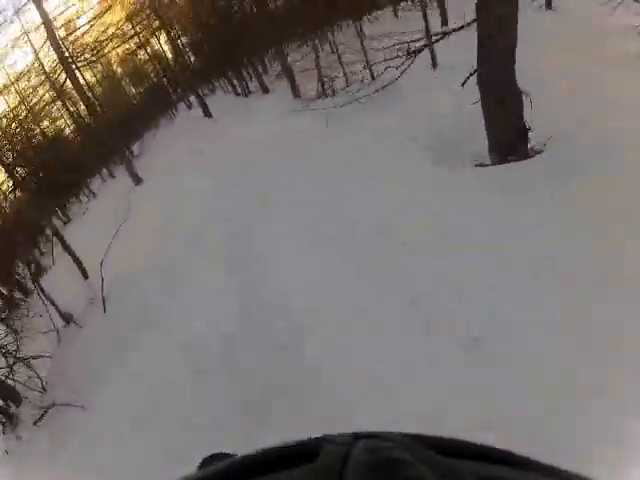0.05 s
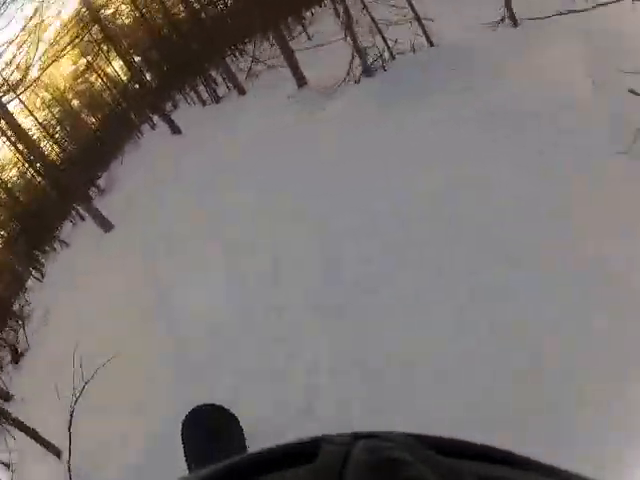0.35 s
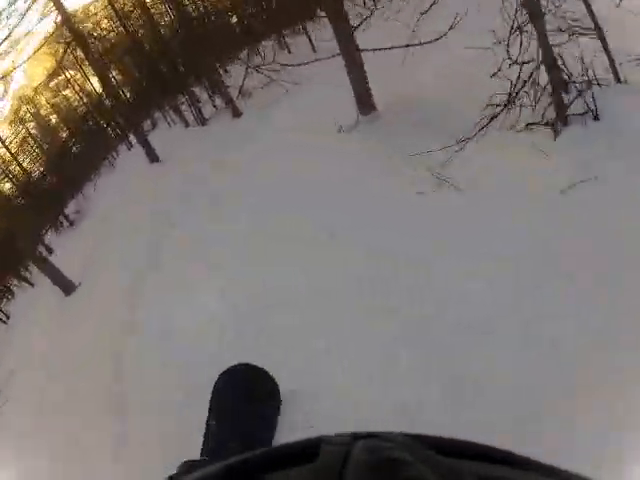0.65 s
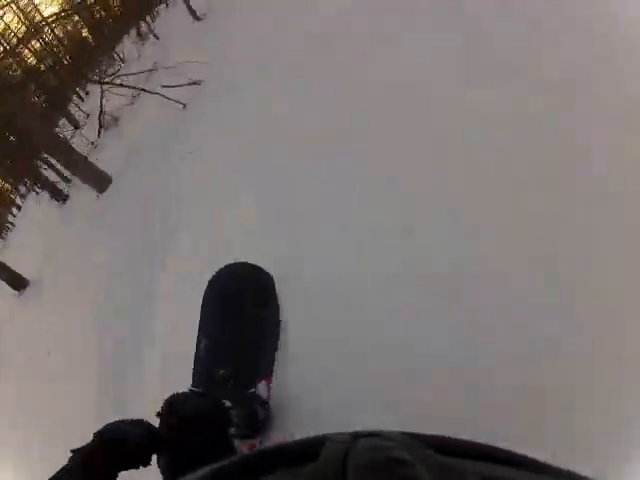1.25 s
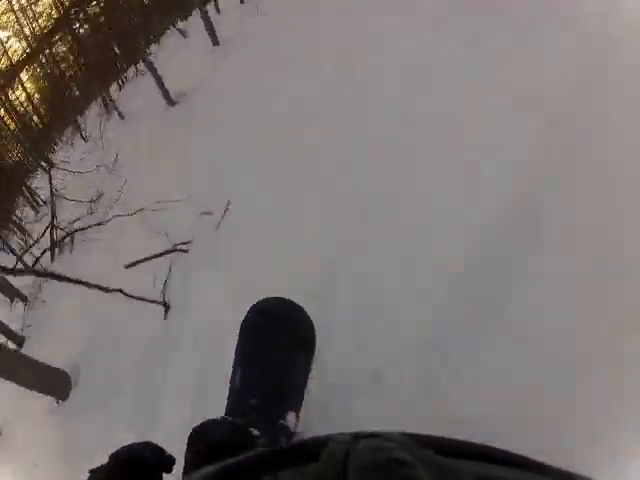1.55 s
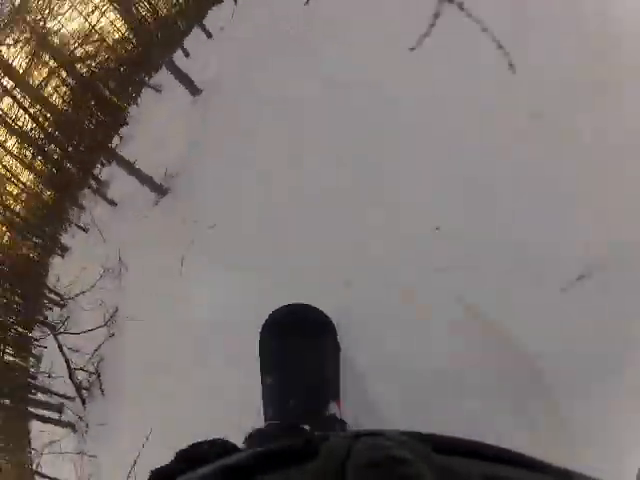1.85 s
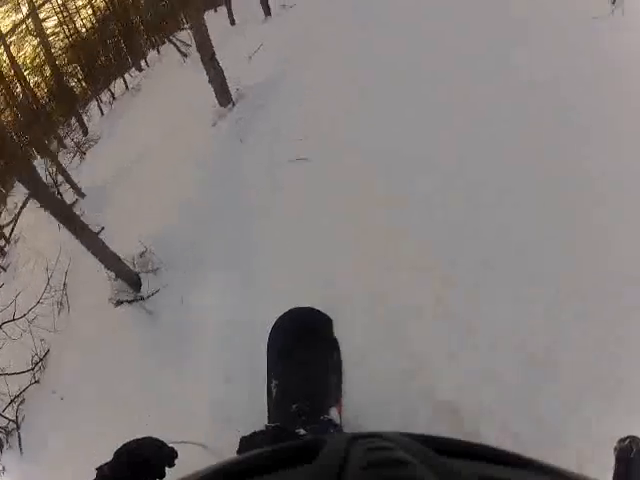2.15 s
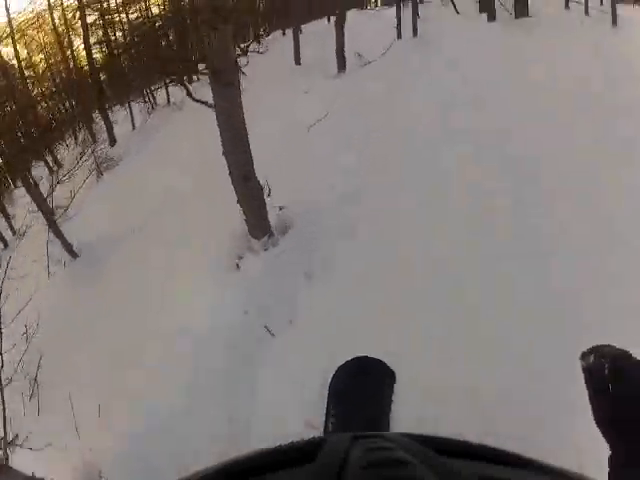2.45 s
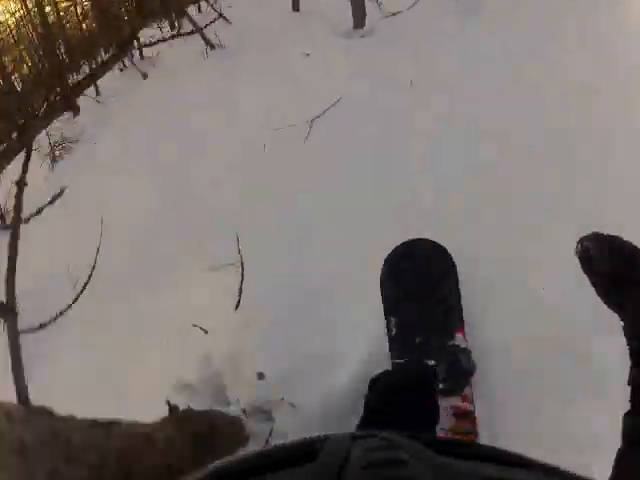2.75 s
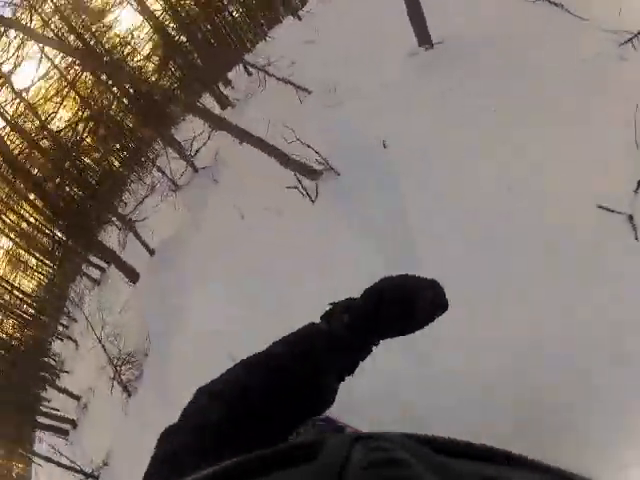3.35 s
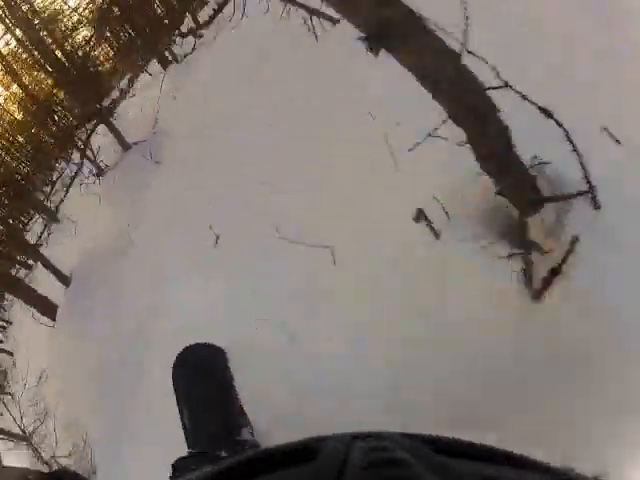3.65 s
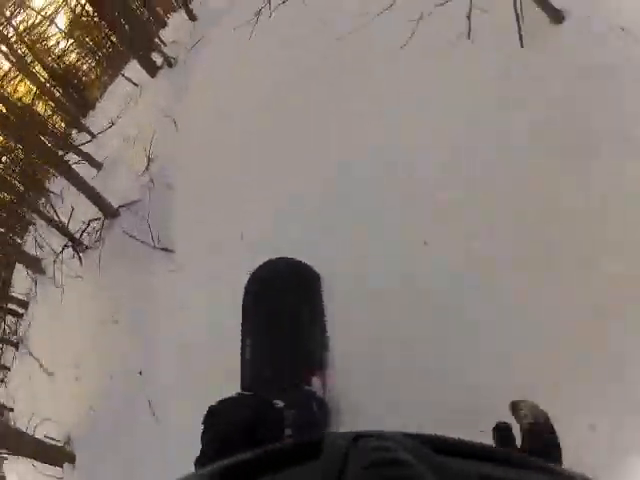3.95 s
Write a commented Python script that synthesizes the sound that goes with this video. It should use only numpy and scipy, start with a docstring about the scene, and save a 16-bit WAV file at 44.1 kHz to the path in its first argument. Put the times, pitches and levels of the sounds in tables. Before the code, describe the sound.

A snowboard hisses and swishes quietly over soft snow among trees, with low wind rumble and dull bumps. Twigs tick against the rider, then two branches crack loudly on the helmet, overloading the cased microphone mounted there.

```python
"""Among trees in soft snow: a snowboard run, heard from a cased camera on the rider's helmet.
The edge throws a swish of snow at each push; the base hisses, drones and jolts over bumps.
Two branches strike the helmet, ring its modes and overload the microphone.
Twigs tick against the rider and wind rumbles on the case."""
import sys
import numpy as np
from scipy import signal
from scipy.fft import rfft, irfft, next_fast_len
from scipy.io import wavfile
from scipy.ndimage import map_coordinates

SR = 44100
rng = np.random.default_rng(int(sys.argv[2]) if len(sys.argv) > 2 else 0)


def store_pcm(level_fs):
    """Save levels as 16-bit WAV."""
    pcm = np.round(np.clip(level_fs, -1, 1) * 32767).astype(np.int16)
    wavfile.write(sys.argv[1], SR, np.atleast_2d(pcm).T)


N = 176400


def amp(db):
    """Decibels to gain."""
    return 10 ** (np.asarray(db) / 20)


def unit_rms(x):
    """Scale to rms 1."""
    return x / np.sqrt(np.mean(x ** 2) + 1e-20)


def gain_at(colour, hz):
    """Gain from (freq_hz, gain_db) points on a log frequency axis."""
    freq_hz, gain_db = np.transpose(colour)
    return amp(np.interp(np.log(hz + 1), np.log(freq_hz + 1), gain_db))


def curve(points):
    """(time_s, value) points to one value per sample."""
    return np.interp(np.arange(N) / SR, *np.transpose(points))


def wobble(rate_hz):
    """Smooth random curve, rate_hz knots a second."""
    return map_coordinates(rng.standard_normal(N // 20), [np.arange(N) * rate_hz / SR], mode="wrap")


def filtered(x, response):
    """Zero-phase filter with gain response(hz)."""
    size = next_fast_len(len(x) + 8192)
    return irfft(rfft(x, size) * response(np.fft.rfftfreq(size, 1 / SR)), size)[:len(x)]


def coloured(x, colour):
    """Filter by a colour table, then scale to rms 1."""
    return unit_rms(filtered(x, lambda hz: gain_at(colour, hz)))


def grainy(colour, grain_db, grain_hz):
    """Coloured noise in tiny clumps, rms 1."""
    return coloured(rng.standard_normal(N) * amp(grain_db * wobble(grain_hz)), colour)


def add(track, start_s, sound):
    """Mix a sound into the track."""
    part = track[round(start_s * SR):][:len(sound)]
    part += sound[:len(part)]


# edge pushes: start_s, length_s, level_db
PUSHES = [(0.103, 0.13, -51.5), (0.206, 0.086, -53.5), (0.272, .15, -53.5), (0.615, 0.16, -55),
          (.7, 0.13, -46.5), (0.79, 0.08, -47), (1.545, 0.065, -56), (1.743, 0.18, -52.5),
          (1.82, 0.16, -61), (2.14, 0.22, -54.5), (2.364, 0.13, -60), (2.73, 0.18, -50.5),
          (2.853, 0.18, -51), (3.548, 0.12, -46.5), (3.678, .16, -50), (3.916, 0.056, -38.5)]
# spray through the case resonances: freq_hz, gain_db
SPRAY_COLOUR = [(400, -36), (700, -24), (970, -23.5), (1150, -7.5), (1310, 5.5), (1490, -24.5), (1670, 4),
                (1900, -12.5), (2240, 3.5), (2550, -8), (3100, -17.5), (3520, -6), (4150, -28.5),
                (5400, -21), (6020, -39.5), (6650, -19.5), (7800, -42), (8480, -9), (9100, -43.5),
                (9750, -9), (10100, -13.5), (10700, -19), (11300, -33), (12700, -34), (13400, -17),
                (14300, -15), (15500, -32)]


def edge(rise_s=0.041, fall_s=0.064, crumbs_per_s=460, crumb_db=-11.5, scatter_db=5):
    """Each push throws a swish of snow and ice crumbs that swells, holds and fades."""
    t, power = np.arange(N) / SR, np.zeros(N)
    for start_s, length_s, level_db in PUSHES:
        shape = np.clip((t - start_s) / rise_s, 0, 1) * np.clip((start_s + length_s - t) / fall_s, 0, 1)
        power += (amp(level_db) * shape) ** 2
    impacts = (rng.random(N) < crumbs_per_s / SR) * rng.standard_normal(N)
    sizes = amp(scatter_db * rng.standard_normal(N))
    crumbs = amp(crumb_db) * coloured(impacts * sizes, CASE_RESPONSE)
    flutter = amp(0.44 * wobble(45))
    spray = grainy(SPRAY_COLOUR, grain_db=-0.5, grain_hz=900)
    return np.sqrt(power) * flutter * (spray + crumbs)


# sliding hiss: time_s, level_db
HISS_LEVEL = [(0, -59.5), (.3, -56), (.44, -60), (.48, -61.5), (.55, -59), (.9, -55.5), (1.07, -55),
              (1.24, -58.5), (1.36, -54.5), (1.46, -63), (1.55, -55.5), (1.7, -55.5), (1.95, -55.5),
              (2.08, -64.5), (2.35, -64), (2.53, -61), (2.68, -57.5), (3.02, -56.5), (3.08, -53),
              (3.16, -57), (3.27, -57), (3.52, -58.5), (3.67, -60.5), (3.89, -52.5), (4, -59.5)]
# hiss spectrum: freq_hz, gain_db
HISS_COLOUR = [(410, -12), (700, -10), (968, -14.5), (1070, -3.5), (1290, -1), (1800, -4.5), (1950, -7),
               (2220, -2), (2490, -7.5), (2690, -7), (3070, -13.5), (3450, -8.5), (4190, -20.5),
               (5150, -18), (6020, -28.5), (6850, -15), (7800, -20), (8430, -15.5), (9600, -18),
               (11400, -18.5), (14200, -16.5), (14700, -19.5), (15500, -47)]
# drone on packed snow: time_s, level_db
DRONE_LEVEL = [(0, -52), (.2, -54), (.3, -56.5), (.48, -65), (.56, -56.5), (.7, -65), (.75, -52),
               (.83, -49), (.93, -53.5), (1.1, -47.5), (1.33, -50.5), (1.45, -64), (1.56, -51), (1.68, -51),
               (1.72, -56), (1.77, -46), (1.86, -50), (1.95, -58.5), (2.08, -66.5), (2.28, -60),
               (2.55, -60.5), (2.74, -60), (2.93, -51.5), (3.1, -56.5), (3.3, -61.5), (3.53, -60),
               (3.6, -55.5), (3.7, -59), (3.82, -58.5), (3.92, -51), (4, -59)]
# drone spectrum: freq_hz, gain_db
DRONE_COLOUR = [(70, -13.5), (160, -2), (290, 1.5), (380, -3), (470, -12), (570, -9), (720, -19),
                (1000, -25.5), (2000, -69)]


def base():
    """The base hisses and drones over uneven snow."""
    hiss = amp(curve(HISS_LEVEL) + 1.7 * wobble(29.62)) * grainy(HISS_COLOUR, grain_db=2, grain_hz=920)
    drone = amp(curve(DRONE_LEVEL) + 0.5 * wobble(35)) * grainy(DRONE_COLOUR, grain_db=2.5, grain_hz=110)
    return hiss + drone


# branch hits: start_s, level_db, spot_mix (0 = contact spot a, 1 = b), crack_db, contact_s, crack_t60_s
BRANCH_HITS = [(2.9621, -0.5, 0.22, -16, 0.0043, .016), (2.9744, -18.5, 0.2, 18.5, 0.00061, 0.0073),
               (3.8436, -1.5, 0.84, -6, 0.0054, 0.016)]
# helmet and case modes: freq_hz, t60_s, spot_a_db, spot_b_db
HELMET_MODES = [(196.6, 0.014, -13, -7), (450, 0.02, -18.5, -13), (797, 0.0087, -20, -16),
                (967, 0.006, -16.5, -19), (1441, 0.0056, -16, -9.5), (1693, 0.0077, 1, -45),
                (1855, .018, -9.5, -4), (2106, 0.012, -10, -7.5), (2335, 0.015, -8, -14.5),
                (2679, 0.016, -4.5, -14.5), (3180, 0.0065, -19.5, -15), (3905, 0.054, -19, -41),
                (9060, 0.023, -15.5, -30.5), (9370, .01, -15, -20.5), (10090, .02, -20, -17),
                (14070, 0.014, -60, -14.5)]
# faint after-ring of the helmet: freq_hz, t60_s, spot_a_db, spot_b_db
SLOW_MODES = [(188, .4, -42, -41), (1440, .42, -38, -66)]
# splintering wood: freq_hz, gain_db
WOOD_COLOUR = [(200, -24), (900, -16), (1300, 7.5), (2200, 3), (3300, 12.5), (4200, -4.5), (6000, -8.5),
               (7800, 7), (8800, 3), (10300, -16.5), (11300, -9), (12300, -35), (15000, -17)]


def branches(rise_s=0.00026, splinter_db=-36.5, splinter_t60_s=0.089):
    """A branch cracks and drives the helmet's modes during contact; its fibres tear faintly after."""
    out, t = np.zeros(N), np.arange(SR // 2) / SR
    for start_s, level_db, spot_mix, crack_db, contact_s, crack_t60_s in BRANCH_HITS:
        free_s = np.maximum(t - contact_s, 0)
        ring = np.zeros(len(t))
        for freq_hz, t60_s, spot_a_db, spot_b_db in HELMET_MODES + SLOW_MODES:
            mode_db = spot_a_db + spot_mix * (spot_b_db - spot_a_db)
            ring += amp(mode_db - 60 * free_s / t60_s) * np.sin(2 * np.pi * (freq_hz * t + rng.random()))
        wood = coloured(rng.standard_normal(len(t)), WOOD_COLOUR)
        crack = amp(crack_db - 8 - 60 * free_s / crack_t60_s)
        splinter = amp(splinter_db - 60 * t / splinter_t60_s)
        attack = 1 - np.exp(-t / rise_s)
        add(out, start_s, amp(level_db) * attack * (ring + wood * (crack + splinter)))
    return out


# twig flicks: start_s, level_db, pitch_hz, t60_s
TWIG_FLICKS = [(0.052, -50.5, 5600, 0.036), (.528, -38.5, 5440, 0.012), (.556, -43, 5500, 0.014),
               (0.589, -47.5, 5060, 0.045), (.883, -45, 5530, .03), (.901, -42, 5430, 0.023),
               (1.206, -43, 5500, .025), (1.28, -47, 4970, 0.04), (1.34, -44.5, 5030, 0.086),
               (1.398, -48.5, 5500, 0.026), (1.574, -42.5, 4040, 0.065), (1.622, -31.5, 3950, 0.0063),
               (1.636, -39, 5470, 0.032), (1.6937, -35, 5500, 0.028), (1.755, -38.5, 5100, 0.055),
               (1.786, -26.5, 4240, 0.014), (1.824, -22.5, 3200, .014), (1.828, -22.5, 4500, 0.013),
               (1.8531, -20, 2170, 0.011), (1.862, -34, 5830, 0.02), (1.8854, -31.5, 1730, 0.014),
               (1.992, -33.5, 5300, 0.013), (1.998, -39.5, 5410, 0.048), (2.507, -42, 5470, 0.051),
               (2.765, -41.5, 5000, .02), (2.816, -41, 5000, 0.088), (3.333, -35, 3120, 0.034),
               (3.3455, -24.5, 3220, 0.011), (3.359, -37.5, 3900, 0.018), (3.41, -33, 6500, 0.011),
               (3.4501, -28.5, 3150, 0.0089), (3.466, -39.5, 2770, 0.019), (3.494, -34, 3670, 0.014),
               (3.53, -40.5, 5440, 0.013), (3.536, -41.5, 5500, 0.032), (3.594, -40, 5500, 0.035),
               (3.684, -47, 4480, .02), (3.696, -44, 5060, .025), (3.711, -40.5, 5000, 0.031),
               (3.827, -41.5, 4450, 0.11), (3.953, -39.5, 5000, 0.021)]
# what the case passes of twig ticks and ice crumbs: freq_hz, gain_db
CASE_RESPONSE = [(200, -18), (900, 4), (1250, 7), (2200, 11.5), (2700, -1), (3250, 9), (3900, -5),
                 (5200, 0), (6000, -14), (6700, 4), (7800, 1.5), (8800, 2.5), (10200, -5), (11300, -16),
                 (14000, -8.5), (16000, -23)]


def twigs(width_oct=1.7, rise_s=0.00016, hold_s=0.00045, ring_loss_db_per_oct=6.5):
    """Twigs flick the rider with dry ticks; thin ones are brighter, thick ones ring briefly."""
    out, t = np.zeros(N), np.arange(SR // 10) / SR
    free_s = np.maximum(t - hold_s, 0)
    for start_s, level_db, pitch_hz, t60_s in TWIG_FLICKS:
        def band(hz):
            octaves = np.log2((hz + 1) / pitch_hz)
            return gain_at(CASE_RESPONSE, hz) * np.exp(-0.5 * (octaves / width_oct) ** 2)
        tick = unit_rms(filtered(rng.standard_normal(len(t)), band))
        ring_db = 1.5 - ring_loss_db_per_oct * np.log2(pitch_hz / 2000)
        ring = amp(ring_db) * np.sin(2 * np.pi * pitch_hz * t)
        envelope = amp(level_db - 6 - 60 * free_s / t60_s) * (1 - np.exp(-t / rise_s))
        add(out, start_s, (tick + ring) * envelope)
    return out


# board jolts: start_s, level_db, pitch_hz
JOLTS = [(0.217, -33.5, 256), (.912, -28, 27.7), (1.754, -32.5, 273), (1.778, -37, 430), (1.837, -26, 100),
         (1.865, -20, 55), (3.642, -25.5, 41.4), (3.95, -34, 32)]


def bumps(rise_cycles=0.31, t60_cycles=4.36):
    """Each bump jolts the board into one soft, low thud."""
    out, t = np.zeros(N), np.arange(SR // 4) / SR
    for start_s, level_db, pitch_hz in JOLTS:
        cycles = pitch_hz * t
        envelope = amp(level_db + 6 - 60 * cycles / t60_cycles) * (1 - np.exp(-cycles / rise_cycles))
        add(out, start_s, envelope * np.sin(2 * np.pi * cycles))
    return out


# wind on the case: time_s, level_db
WIND_LEVEL = [(0.0, -49), (0.24, -43.5), (0.27, -49), (0.63, -47.5), (0.75, -34.5), (0.88, -39.5),
              (0.92, -42), (0.99, -39.5), (1.39, -43.5), (1.43, -39.5), (1.57, -49.5), (1.64, -38.5),
              (1.84, -39), (1.86, -31.5), (2.25, -57), (2.28, -47), (2.55, -51.5), (2.71, -39.5),
              (2.81, -46), (2.86, -34.5), (2.88, -43.5), (2.96, -44), (3.02, -46), (3.42, -38), (3.44, -45),
              (3.61, -37), (3.64, -39), (3.78, -40), (3.85, -35), (3.93, -43), (3.97, -31), (4.0, -31)]
# wind spectrum: freq_hz, gain_db
WIND_COLOUR = [(6, -6.5), (17, 8.5), (32, -1.5), (55, -4.5), (80, -3), (105, -10), (150, -35), (300, -44.5),
               (800, -84)]


def wind():
    """Air buffets the case with a low, lumpy rumble."""
    return amp(curve(WIND_LEVEL) + 0.4 * wobble(9.8)) * grainy(WIND_COLOUR, grain_db=-0.5, grain_hz=120)


def scene():
    """All sources sum at one microphone."""
    return (edge() + base() + wind() + bumps() + twigs() + branches())[None]


def gain_control(x, threshold, max_dip_db=9, recover_s=0.034, lag_s=0.0057):
    """Peaks over the threshold dip the gain, slightly late; it then recovers."""
    excess = np.maximum(np.abs(x) - threshold, 0)
    held = signal.lfilter([1], [1, -np.exp(-1 / (recover_s * SR))], excess)
    dip = np.pad(np.tanh(held / 10), (round(lag_s * SR), 0))[:N]
    return amp(-max_dip_db * dip)


# camera response: freq_hz, gain_db
CAMERA_RESPONSE = [(5000, -0.5), (6000, 0.5), (7500, -6.5), (9500, 0), (10800, -2), (11800, -11),
                   (12700, -9.5), (13600, -2)]
CLIP_LEVEL, DISTORTION_TOP_HZ, CAMERA_TOP_HZ = 0.41, 10930, 15700


def record(dry):
    """Branch hits overload the microphone; the camera ducks, colours and band-limits the sound."""
    x = dry[0]
    clipped = x / (1 + (x / CLIP_LEVEL) ** 4) ** (1 / 4)
    x = x + filtered(clipped - x, lambda hz: 1 / (1 + (hz / DISTORTION_TOP_HZ) ** 40))
    x = x * gain_control(x, threshold=CLIP_LEVEL / 2)
    return filtered(x, lambda hz: gain_at(CAMERA_RESPONSE, hz) / (1 + (hz / CAMERA_TOP_HZ) ** 160))[None]


dry = scene()
out = record(dry)
store_pcm(out)
```